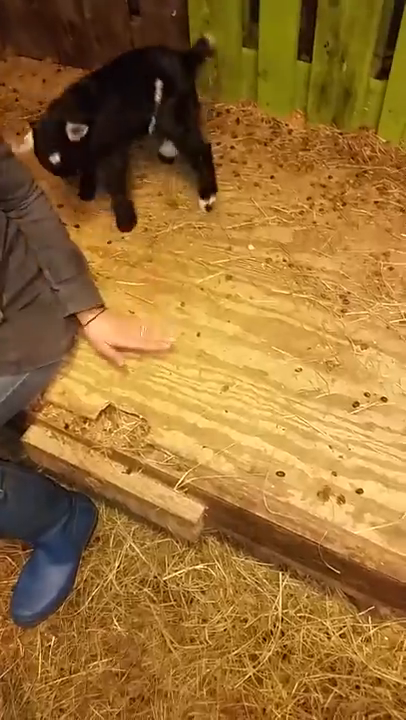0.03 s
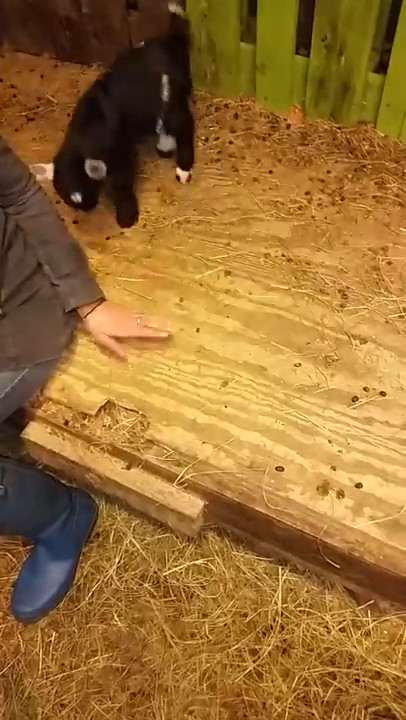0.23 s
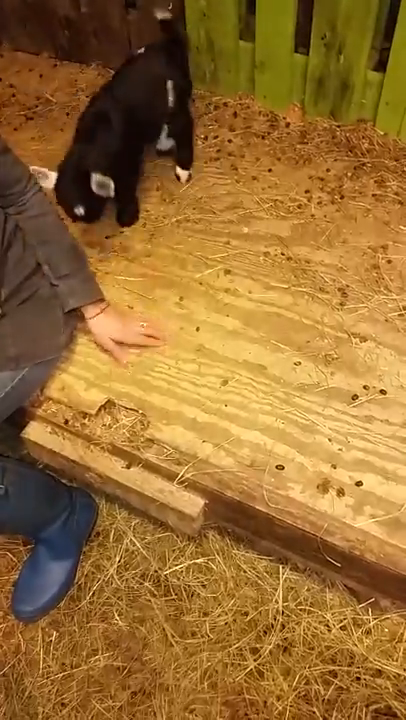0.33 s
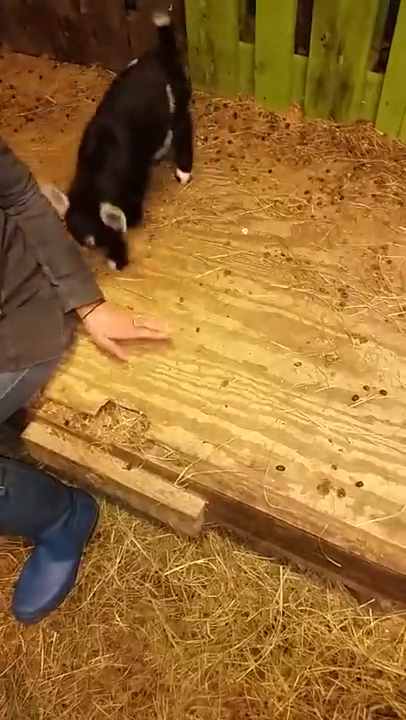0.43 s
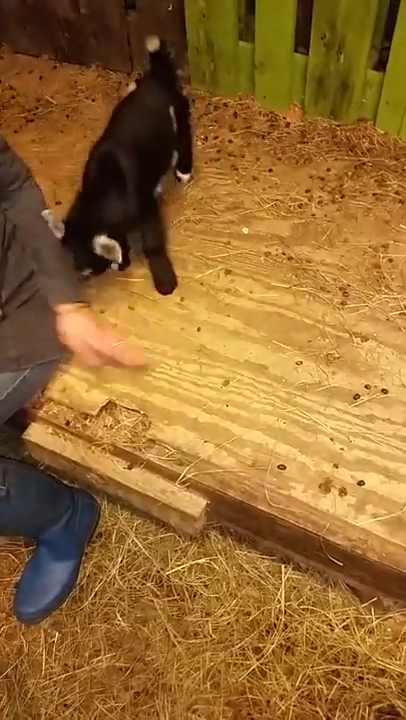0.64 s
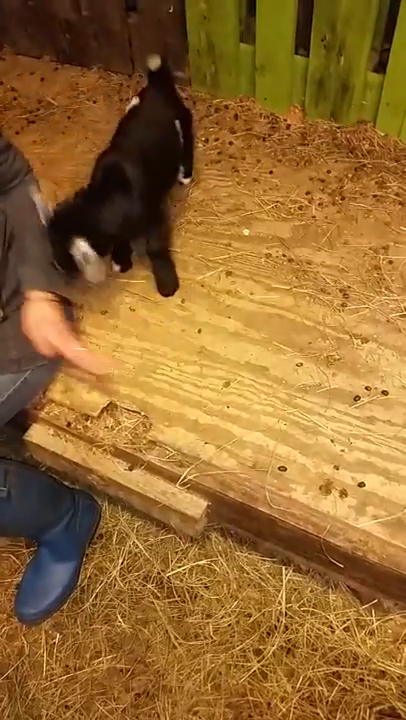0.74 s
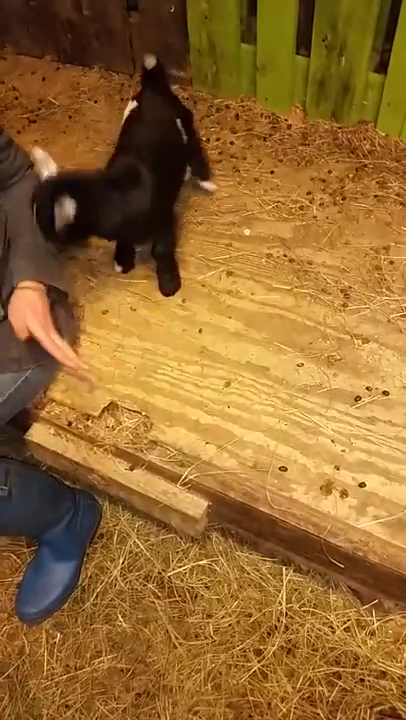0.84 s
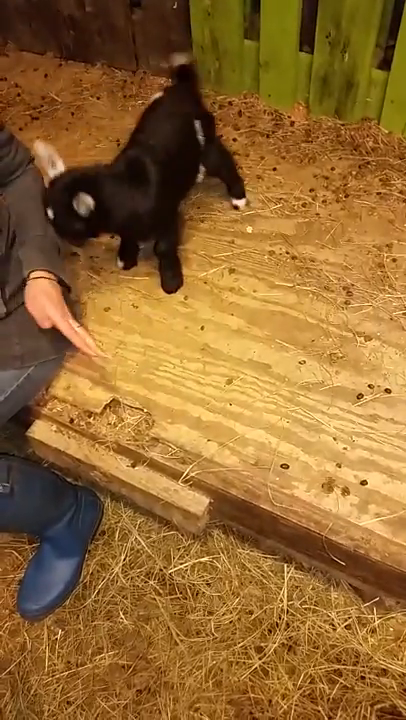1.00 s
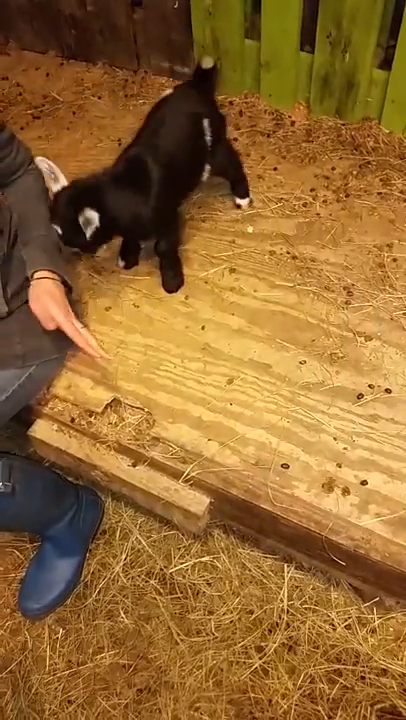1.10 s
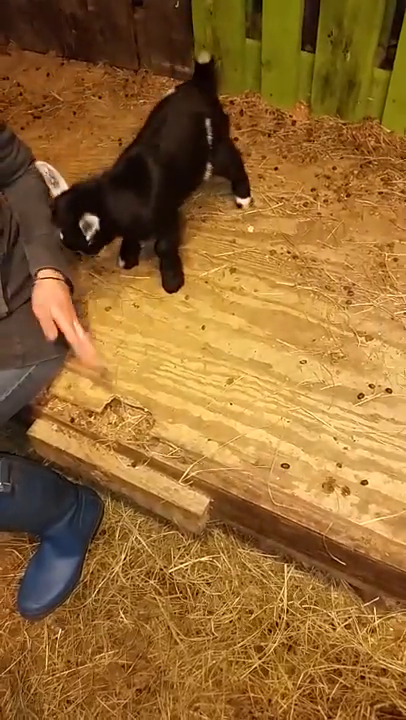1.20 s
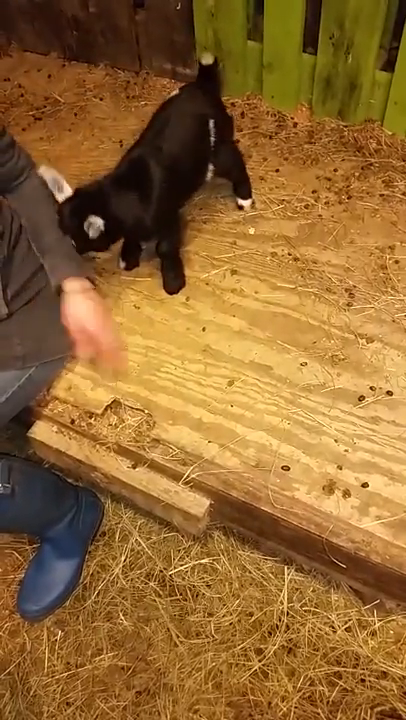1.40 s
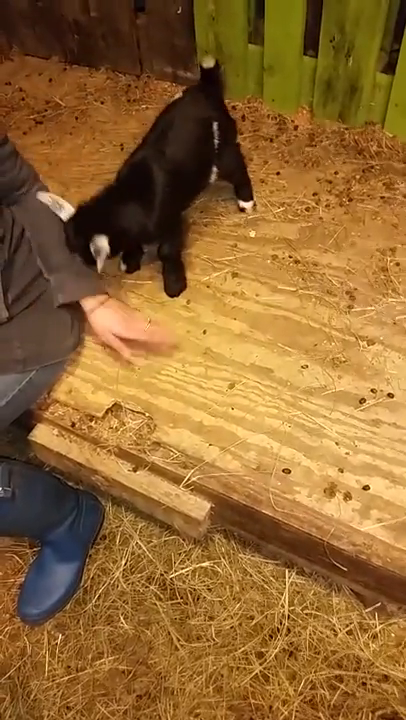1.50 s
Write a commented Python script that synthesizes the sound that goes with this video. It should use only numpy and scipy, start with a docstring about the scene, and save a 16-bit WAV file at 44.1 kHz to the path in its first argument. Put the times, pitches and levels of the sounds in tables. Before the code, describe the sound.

Hollow hoof knocks and gritty ticks sound close to the microphone as a baby goat steps about on wooden boards. The steps start light, get louder with a short scuff, then fade, over soft rustling and low barn rumble.

```python
"""Goat kid on a plywood platform

Inside a barn, a stereo microphone close to a hollow plywood platform where a goat kid steps about.
Each hoof ticks on the gritty sheet, knocks its modes and sets the whole deck thumping; a few steps skid.
Straw and clothing rustle softly over the barn's low rumble; nearby boards and the barn echo the hooves."""
import sys
import numpy as np
from scipy import signal
from scipy.fft import rfft, irfft
from scipy.io import wavfile

SR = 44100
rng = np.random.default_rng(int(sys.argv[2]) if len(sys.argv) > 2 else 0)


def digitize_waveform(pressure):
    """Quantize a signal to 16-bit integers and store it at the path in sys.argv[1].

    Rows of a 2-D input are taken as channels; values are limited to [-1, 1].
    """
    field = np.atleast_2d(pressure).T
    bounded = np.clip(field, -1, 1)
    quanta = np.round(bounded * 32767).astype(np.int16)
    wavfile.write(sys.argv[1], SR, quanta)


N = 68355

# The sound fades in over the first 0.09 s; then the low rumble swells and eases: time_s, level_db
RUMBLE_LEVELS = [(0.0, -93.5), (0.09, -58.5), (0.3, -52), (0.6, -45), (0.85, -45), (1.05, -46.5),
                 (1.25, -49.5), (1.55, -55)]
# Tone of the rumble: frequency_hz, relative_db
RUMBLE_SPECTRUM = [(20, -12), (45, -5), (62, -2.5), (80, -4), (110, -3.5), (200, -11), (350, -21),
                   (700, -30.5), (1400, -41.5), (4000, -52.5), (14000, -62)]
# Course of the straw and clothing rustle: time_s, level_db
RUSTLE_LEVELS = [(0.06, -96), (0.10, -80), (0.165, -73.5), (0.185, -60), (0.25, -63.5), (0.33, -57),
                 (0.39, -65), (0.44, -61), (0.50, -69), (0.6, -65), (0.69, -53.5), (0.73, -69), (0.83, -61),
                 (0.96, -62.5), (1.08, -71.5), (1.16, -58), (1.20, -69), (1.32, -75), (1.55, -76.5)]
# Tone of the rustle: frequency_hz, relative_db
RUSTLE_SPECTRUM = [(200, -20), (700, -11), (1500, -7.5), (2500, -8), (4000, -13.5), (5800, -9.5),
                   (7100, 4.5), (8300, -1), (10000, 5), (11200, 1), (12600, 7), (15000, -3)]
# Single stalks cracking: start_s, level_db
STALK_CRACKS = [(0.151, -58.5), (0.397, -60), (1.12, -58), (1.191, -54)]
# Hoof falls and how hard each drives the wood and grit: start_s, thump_db, weight_lag_s, knock_db,
# knock_pitch_hz, clack_db, clack_pitch_hz, snap_db, tick_db, tick_left_minus_right_db
HOOF_FALLS = [(0.092, -44.5, 0.00054, -54.5, 236, -74, 700, -78, -59.5, 1),
              (0.179, -33.5, 0.0075, -39.5, 210, -50.5, 346, -64, -50, 0),
              (0.308, -40, 0.0053, -47.5, 185, -84, 600, -83, -67, 11),
              (0.414, -23, .009, -25.5, 252, -46.5, 426, -56.5, -44.5, -9),
              (0.547, -29.5, 0.0025, -34, 170, -39.5, 1360, -66, -40, 2.5),
              (0.638, -40.5, 0.0079, -21.5, 425, -23.5, 930, -48, -42.5, 10),
              (0.652, -23.5, 0.00084, -16.5, 216, -37, 900, -51.5, -40.5, -8.5),
              (0.672, -36, 0.01, -32.5, 259, -32.5, 580, -47, -66, 2),
              (0.749, -33, 0.0147, -24, 298, -38.5, 463, -60, -45, 0),
              (0.804, -54, 0.0055, -30, 220, -39.5, 1200, -55, -59, 1),
              (0.959, -47, 0.0013, -46, 328, -41, 610, -58, -78, -2),
              (1.101, -44, 0.0094, -37, 252, -34, 425, -55.5, -69, 16),
              (1.22, -45.5, 0.0038, -52, 218, -51, 650, -63, -46, 4),
              (1.366, -46.5, 0.0052, -59, 315, -47.5, 480, -61, -57.5, -0.5),
              (1.445, -44, 0.0052, -52, 193, -70, 684, -85, -76, 20)]
# Hooves skidding: peak_s, rise_s, fall_s, judder_db, judder_pitch_hz, grit_db
HOOF_SKIDS = [(0.642, 0.0066, 0.0084, -22, 860, -48.5), (0.963, 0.019, 0.016, -40, 590, -62.5),
              (1.482, 0.018, 0.031, -54, 760, -87)]
# Modes of the platform (two thump, five knock, the rest clack): pitch_hz, gain_db, t60_s
DECK_MODES = [(82.2, 1.5, 0.35), (110.7, 2.5, .13), (149.7, -5, 0.19), (204.3, -4.5, 0.18),
              (248.2, -6.5, 0.14), (276.8, -7, 0.12), (364.8, -11.5, .16), (505.4, -2.5, .13),
              (538, -5, 0.2), (637, -0.5, 0.1), (702, -0.5, 0.082), (768, -1, 0.065), (888, -8, 0.13),
              (1116.4, -1, 0.075), (2006, -5, 0.047), (2635, -13.5, 0.12)]
# Tone of horn chattering on wood: frequency_hz, relative_db
CLACK_SPECTRUM = [(150, -16), (400, 4), (750, 3), (1150, -7.5), (1500, -22), (2500, -21), (3500, -27),
                  (6000, -31), (15000, -65)]
# Tone of the hoof rim's snap: frequency_hz, relative_db
SNAP_SPECTRUM = [(400, -10), (1200, 4.5), (1900, 0), (2700, -1), (3500, -14), (5000, -28), (15000, -28)]
# Tone of crushed grit: frequency_hz, relative_db
GRIT_SPECTRUM = [(300, -12), (1500, -7.5), (3000, -11.5), (5500, -12), (7200, 6), (8400, -1), (10000, 8.5),
                 (11200, -0.5), (12700, 8.5), (15000, -0.5)]
# Response of the barn's reverberation: frequency_hz, gain_db
BARN_RESPONSE = [(50, -20), (120, -15), (250, -19), (700, -22.5), (2000, -5.5), (7000, -9), (15000, -24)]
# The deck sagging under the kid's full weight: peak_s, level_db
DECK_SAGS = [(0.583, -37), (0.784, -32.5), (1.217, -40.5)]

GRAINS_PER_S, GRAIN_SPREAD_DB, GRAIN_POWER_SHARE = 3500, -1, 0.41
STRAW_FALL_S, RUSTLE_PAN_DB = 0.0012, 1
CLACK_FALL_S, CLACK_WIDTH_OCTAVES, CLACK_PAN_DB = 0.004, 0.73, 4
CLACK_JUDDER_DB, CLACK_STRIKE_DB, CLACK_DRY_DB = -15.5, -13.5, -11
SNAP_FALL_S, SNAP_PAN_DB = 0.003, 5
TICK_FALL_S, TICK_TAIL_S, TICK_TAIL_DB = 0.001, 0.0098, -12
KNOCK_LAG_S, KNOCK_WIDTH_OCTAVES, KNOCK_BAND_HZ = 0.00091, 0.69, (130, 467)


def from_db(db):
    """Decibels to gain."""
    return 10 ** (np.asarray(db) / 20)


def unit_rms(x):
    """Scale to unit rms."""
    return x / np.sqrt(np.mean(x ** 2) + 1e-20)


def fader(points):
    """Gain over time from (time_s, level_db) points."""
    return from_db(np.interp(np.arange(N) / SR, *np.transpose(points)))


def pan(db):
    """Channel gains with the left louder than the right by db."""
    return from_db(np.array([[.5], [-.5]]) * db)


def spectrum_gains(points):
    """Gains on the padded FFT grid from (frequency_hz, gain_db) points."""
    hz, db = np.transpose(points)
    grid_hz = np.arange(N + 1) * SR / (2 * N)
    return from_db(np.interp(np.log(grid_hz + 1), np.log(hz), db))


def colour(x, points):
    """Minimum-phase filter with the given spectrum; keeps the power of white noise."""
    cepstrum = irfft(np.log(unit_rms(spectrum_gains(points))))
    cepstrum[1:N] *= 2
    cepstrum[N + 1:] = 0
    return irfft(rfft(x, 2 * N) * np.exp(rfft(cepstrum)))[..., :N]


def low_cut(x, hz):
    """First-order high-pass."""
    return signal.sosfilt(signal.butter(1, hz, "high", fs=SR, output="sos"), x)


def swell(peak_s, rise_s, fall_s):
    """Exponential rise to a peak, then exponential fall."""
    t = np.arange(N) / SR - peak_s
    return np.exp(np.maximum(np.minimum(t / rise_s, -t / fall_s), -60))


def burst(start_s, fall_s):
    """Near-instant attack, exponential fall."""
    return swell(start_s, 4 / SR, fall_s)


def blows(times_s, db):
    """One click for each hoof fall."""
    clicks = np.zeros(N)
    np.add.at(clicks, np.clip((times_s * SR).astype(int), 0, N - 1), from_db(db))
    return clicks


def ring(x, hz, t60_s):
    """One mode: a unit click sets off a dying sine of height 1."""
    r, w = from_db(-60 / (t60_s * SR)), 2 * np.pi * hz / SR
    return signal.lfilter([0, np.sin(w)], [1, -2 * r * np.cos(w), r * r], x + 1e-18)


def mode_share_db(hz, centre_hz, octaves):
    """Where the hoof lands favours the modes near one pitch."""
    return -5 * (np.log2(hz / centre_hz) / octaves) ** 2


def stereo_noise(likeness):
    """White noise; likeness is the share of power common to both channels."""
    common = np.sqrt(likeness) * rng.standard_normal(N)
    return common + np.sqrt(1 - likeness) * rng.standard_normal((2, N))


def grains():
    """Dense tiny cracks of straw or grit in a smooth hiss."""
    sizes = from_db(GRAIN_SPREAD_DB * np.minimum(rng.exponential(1, N), 5))
    hits = rng.random(N) < GRAINS_PER_S / SR
    cracks = unit_rms(hits * sizes * stereo_noise(likeness=.05))
    hiss = stereo_noise(likeness=.05)
    return np.sqrt(GRAIN_POWER_SHARE) * cracks + np.sqrt(1 - GRAIN_POWER_SHARE) * hiss


def barn_rumble():
    """Low room tone of the barn, alike in both channels in the bass."""
    side = 1.02 * low_cut(rng.standard_normal(N), hz=600)
    mid = rng.standard_normal(N)
    return fader(RUMBLE_LEVELS) * colour(mid + side * np.array([[1], [-1]]), RUMBLE_SPECTRUM)


def straw_rustle():
    """Straw and clothing brush softly; now and then a stalk cracks."""
    cracks = sum(from_db(db) * burst(start_s, STRAW_FALL_S) for start_s, db in STALK_CRACKS)
    return pan(RUSTLE_PAN_DB) * (fader(RUSTLE_LEVELS) + cracks) * colour(grains(), RUSTLE_SPECTRUM)


def hoof_clacks():
    """Left of centre, hard horn strikes, chatters or skids on the wood and rings the upper modes."""
    start_s, clack_db, clack_hz = np.transpose(HOOF_FALLS)[[0, 5, 6]]
    landings = [from_db(db) * burst(s, CLACK_FALL_S) for s, db in zip(start_s, clack_db)]
    skids = [from_db(db) * swell(s, rise, fall) for s, rise, fall, db, _, _ in HOOF_SKIDS]
    contacts = np.array(landings + skids)
    centres_hz = np.append(clack_hz, np.transpose(HOOF_SKIDS)[4])
    chatter = stereo_noise(likeness=.78)
    ringing = 0
    for k, (hz, db, t60_s) in enumerate(DECK_MODES[7:]):
        share_db = mode_share_db(hz, centres_hz, CLACK_WIDTH_OCTAVES)
        judder = (from_db(CLACK_JUDDER_DB + share_db) @ contacts) * chatter / np.sqrt(SR / 100)
        strike = blows(start_s, clack_db + CLACK_STRIKE_DB + share_db[:len(start_s)])
        ringing += (-1) ** k * from_db(db) * ring(judder + strike, hz, t60_s)
    scrape = from_db(CLACK_DRY_DB) * colour(contacts.sum(axis=0) * chatter, CLACK_SPECTRUM)
    return pan(CLACK_PAN_DB) * (ringing + scrape)


def rim_snaps():
    """The rim of the hoof meets the wood with a short dry snap."""
    start_s, snap_db = np.transpose(HOOF_FALLS)[[0, 7]]
    contact = sum(from_db(db) * burst(s, SNAP_FALL_S) for s, db in zip(start_s, snap_db))
    return pan(SNAP_PAN_DB) * colour(contact * stereo_noise(likeness=.1), SNAP_SPECTRUM)


def grit_crunch():
    """Grit crushed under each hoof: a sharp tick and a short crunch, drawn out in the skids."""
    ticks = 0
    for start_s, *_, db, pan_db in HOOF_FALLS:
        tail = from_db(TICK_TAIL_DB) * burst(start_s, TICK_TAIL_S)
        ticks += pan(pan_db) * from_db(db) * (burst(start_s, TICK_FALL_S) + tail)
    skids = sum(from_db(db) * swell(s, rise, fall) for s, rise, fall, _, _, db in HOOF_SKIDS)
    return colour((ticks + pan(CLACK_PAN_DB) * skids) * grains(), GRIT_SPECTRUM)


def deck_thumps():
    """The weight follows each hoof; the two lowest modes swing against each other into a thump."""
    start_s, thump_db, lag_s = np.transpose(HOOF_FALLS)[:3]
    weight = blows(start_s + lag_s, thump_db)
    lower, upper = (from_db(db) * ring(weight, hz, t60_s) for hz, db, t60_s in DECK_MODES[:2])
    return lower - upper


def sheet_knocks():
    """Each hoof knocks the middle modes of the plywood sheet."""
    start_s, knock_db, knock_hz = np.transpose(HOOF_FALLS)[[0, 3, 4]]
    knocks = 0
    for hz, db, t60_s in DECK_MODES[2:7]:
        drive_db = knock_db + db + mode_share_db(hz, knock_hz, KNOCK_WIDTH_OCTAVES)
        knocks += ring(blows(start_s + KNOCK_LAG_S, drive_db), hz, t60_s)
    return -signal.sosfilt(signal.butter(2, KNOCK_BAND_HZ, "band", fs=SR, output="sos"), knocks)


def fence_echoes(x, t60_s=0.11, gap_s=0.003, level_db=-4):
    """Quick scattered echoes off the boards close by, different in each channel."""
    t = np.arange(N) / SR
    echoes = rng.standard_normal((2, N)) * from_db(-60 * t / t60_s) * (t > gap_s)
    echoes /= np.sqrt(np.sum(echoes ** 2, axis=1, keepdims=True))
    return from_db(level_db) * irfft(rfft(x, 2 * N) * rfft(echoes, 2 * N))[:, :N]


def barn_reverb(x, t60_s=0.66, gap_s=0.027):
    """The barn's diffuse tail reaches the microphone later, wide above the bass."""
    t = np.arange(N) / SR
    mid, side = rng.standard_normal((2, N)) * from_db(-60 * t / t60_s) * (t > gap_s)
    tail = (mid + low_cut(side, hz=250) * np.array([[1], [-1]])) / np.sqrt(np.sum(mid ** 2))
    return irfft(rfft(x, 2 * N) * rfft(tail, 2 * N) * spectrum_gains(BARN_RESPONSE))[:, :N]


def deck_sags(pitch_hz=52, half_width_s=0.014):
    """Under the full weight the whole deck makes one slow swing: a deep thud."""
    thuds = 0
    for peak_s, db in DECK_SAGS:
        t = np.arange(N) / SR - peak_s
        thuds -= from_db(db) * np.exp(-(t / half_width_s) ** 2) * np.cos(2 * np.pi * pitch_hz * t)
    return thuds


def scene():
    """At the microphone: close hooves, their echoes, and the rustle and rumble of the barn."""
    contacts = hoof_clacks() + rim_snaps() + grit_crunch()
    hooves = contacts + deck_thumps() + sheet_knocks() + deck_sags()
    return hooves + fence_echoes(contacts) + barn_reverb(hooves) + straw_rustle() + barn_rumble()


def record(dry):
    """A steep high cut at 14.6 kHz."""
    return signal.sosfilt(signal.ellip(10, .3, 70, 14600, fs=SR, output="sos"), dry)


dry = scene()
out = record(dry)
digitize_waveform(out)
```